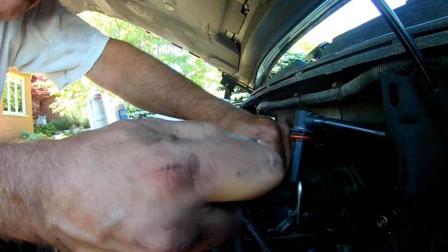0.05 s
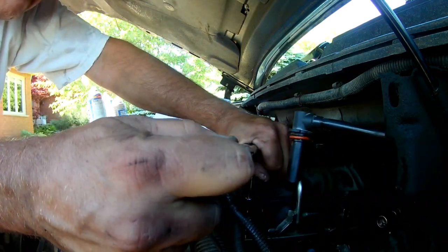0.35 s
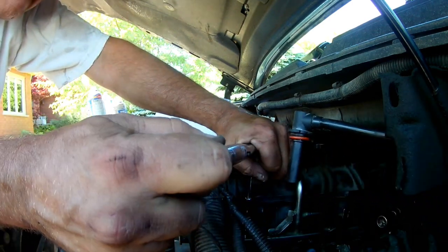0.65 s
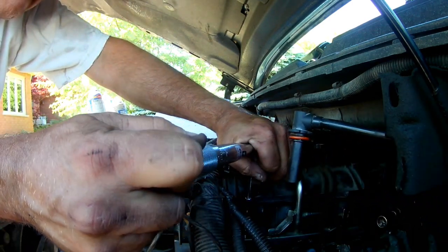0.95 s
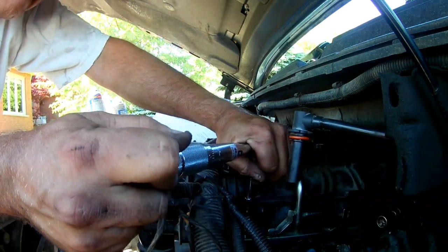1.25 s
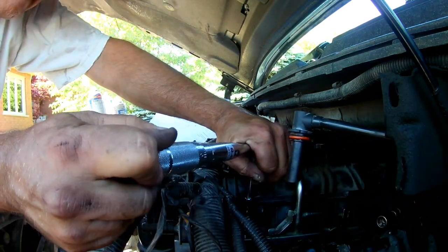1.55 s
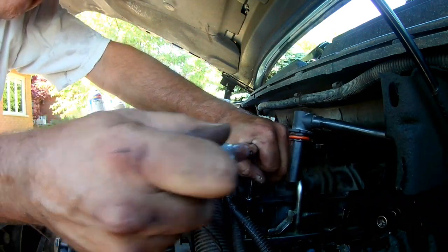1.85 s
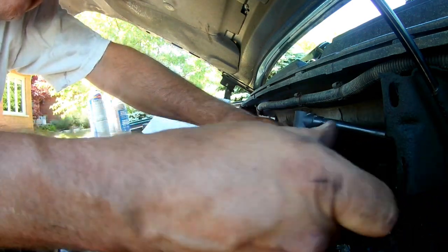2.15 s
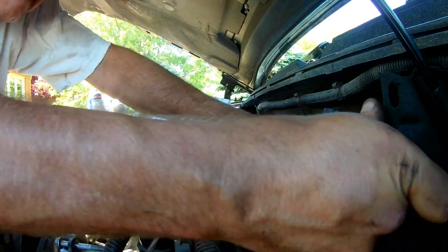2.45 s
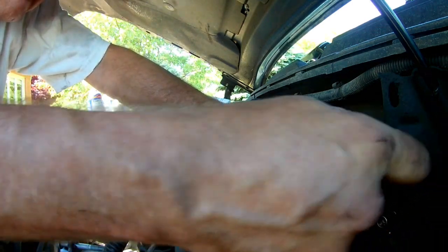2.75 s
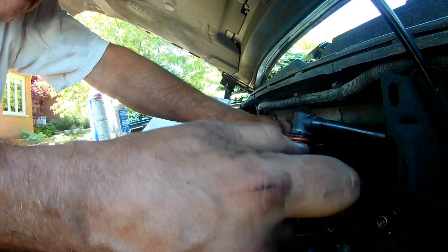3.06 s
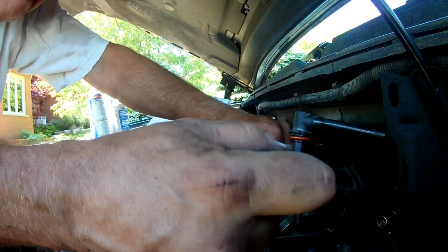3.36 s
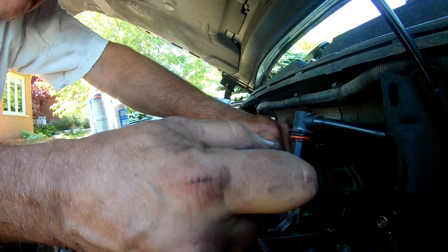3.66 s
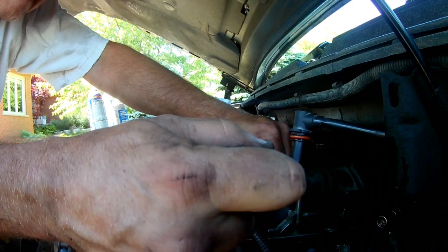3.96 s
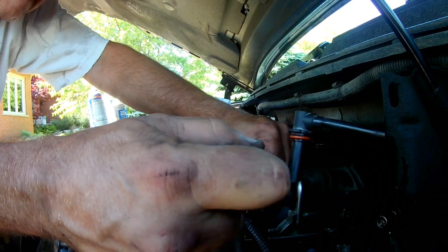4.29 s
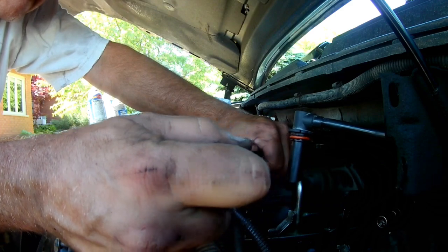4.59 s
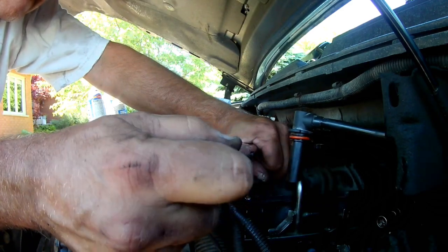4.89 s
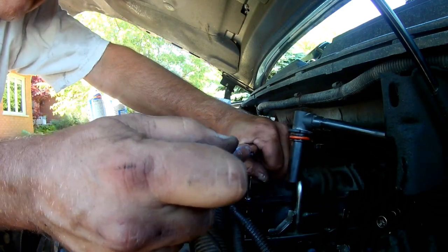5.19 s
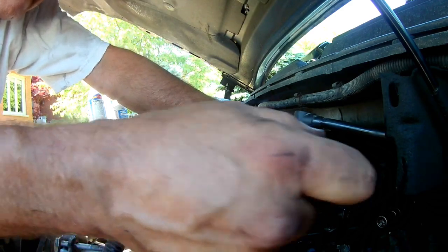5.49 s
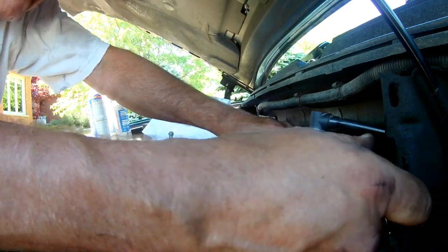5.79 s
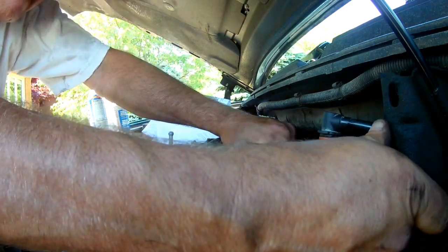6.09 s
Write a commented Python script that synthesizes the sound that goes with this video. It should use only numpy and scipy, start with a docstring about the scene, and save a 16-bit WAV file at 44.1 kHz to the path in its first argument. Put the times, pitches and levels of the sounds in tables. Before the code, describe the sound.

A torque wrench snaps loudly twice per pull on an engine bolt, two pulls, with small ticks and a thud against sheet metal between them.

```python
"""A low outdoor rumble and a faint, fading ring of steel come first. Then a torque wrench is pulled twice
on a bolt in an engine bay, close by. On each pull a lever in its head slaps the tube with a loud snap,
and snaps again as it resets. Around the pulls the tool ticks and knocks, bumps the bodywork once, and
a sleeve brushes past. The raised hood gives the metal sounds a short echo."""
import sys
import numpy as np
from scipy import signal
from scipy.fft import rfft, irfft
from scipy.io import wavfile
from scipy.ndimage import map_coordinates

SR = 44100
rng = np.random.default_rng(int(sys.argv[2]) if len(sys.argv) > 2 else 0)


def transcribe(u):
    """Save the signal u as a 16-bit wav file named by the first command-line argument.

    u: samples, shape (n,) or (channels, n), limited to [-1, 1]; the rate is SR.
    q: integer samples, one column per channel.
    """
    v = np.clip(np.atleast_2d(u).T, -1, 1)
    q = np.round(v * 32767).astype(np.int16)
    wavfile.write(sys.argv[1], SR, q)


N = 274952

# the noisy part of a light tap on steel: pitch_hz, level_db
TAP_NOISE = [(300, -4), (700, 1.5), (1300, 1.5), (2400, -1.5), (4000, -2.5), (6500, -11), (9000, -11),
             (12000, -30)]


def undb(db):
    """Turn decibels into a number to multiply by."""
    return 10 ** (np.asarray(db) / 20)


def add(track, start_s, sound):
    """Mix a sound into a track."""
    start = int(start_s * SR)
    track[start:start + len(sound)] += sound[:N - start]


def dull(sound, cutoff_hz):
    """Soften the treble above the cutoff."""
    return signal.sosfilt(signal.butter(2, min(cutoff_hz, .45 * SR), fs=SR, output="sos"), sound)


def noise_bands(spectrum, size):
    """Return pitches and half-octave bands of noise. The spectrum sets their balance, not their total."""
    points_hz, db = np.transpose(spectrum)
    octave = np.log2(np.maximum(np.fft.rfftfreq(size, 1 / SR), 1))
    gain = undb(np.interp(octave, np.log2(points_hz), db))
    gain *= np.sqrt(size / np.sum(gain ** 2) / 2)
    centres = np.arange(4, 14.1, .5)[:, None]
    share = np.sqrt(np.maximum(1 - 2 * np.abs(octave - centres), 0))
    noise = rng.standard_normal((len(centres), size))
    return 2 ** centres, irfft(rfft(noise) * share * gain, size)


def fade(hz, ring_s, hold_s, linger=0.71, settle_s=0.00025):
    """Loudness of a hit: rises, stays level for hold_s, drops, then loses 60 dB every ring_s."""
    t = np.arange(SR) / SR
    free_s = np.maximum(t - hold_s, 0)
    rise = 1 - np.exp(-2 * t * hz)
    drop = linger + (1 - linger) * np.exp(-free_s / settle_s)
    return rise * drop * np.exp(-np.log(1000) * free_s / ring_s)


def ring(tones, hold_s=0, detune=0.0011):
    """Struck metal rings in fading tones, slightly retuned by the grip on every hit."""
    hz, db, ring_s = np.transpose(tones)[:, :, None]
    chance = rng.standard_normal((len(tones), 2))
    cycles = hz * (1 + detune * chance[:, :1]) * np.arange(SR) / SR + chance[:, 1:]
    return np.sum(undb(db) * fade(hz, ring_s, hold_s) * np.sin(2 * np.pi * cycles), axis=0)


def hit(tones, noise, noise_db, ring_s, slope, hold_s):
    """One metal contact: clear tones over a noisy crack. More slope makes the crack's treble die sooner."""
    hz, bands = noise_bands(noise, SR)
    stretch = (1000 / hz) ** slope
    crack = np.sum(bands * fade(hz, ring_s * stretch, hold_s * stretch), axis=0)
    return ring(tones, hold_s) + undb(noise_db) * crack


def drift(rate_hz):
    """A smooth random wobble, roughly between -1 and 1."""
    steps = rng.standard_normal(512)
    return map_coordinates(steps, [np.arange(N) / SR * rate_hz], order=2, mode="wrap")


def outdoors(level_db=-51.7, swell_db=1.0, flicker_db=0.74):
    """A distant rumble whose bands swell together and flicker on their own."""
    # the rumble from bass to treble: pitch_hz, level_db
    rumble_noise = [(20, -16), (45, -7), (70, -3.5), (95, 0), (120, -3), (160, -8.5), (250, -14.5),
                    (400, -17.5), (800, -20), (1300, -25.5), (2200, -34.5), (4500, -39.5), (12000, -47)]
    _, bands = noise_bands(rumble_noise, N)
    rumble = sum(band * undb(flicker_db * drift(3.2)) for band in bands)
    return rumble * undb(level_db - swell_db * drift(0.91))


def fading_steel():
    """A steel part is still ringing faintly at the start."""
    # its tones: pitch_hz, level_db, ring_s
    fading_tones = [(553, -53, 1), (1720, -62, 0.49)]
    return ring(fading_tones)


def snap(tones, noise, bright_db, noise_db, spread_s):
    """Hard steel meets with a bright click; the hit then spreads through tube, socket and engine."""
    # the first touch of the steel: pitch_hz, level_db
    bright_noise = [(3000, -14), (6000, -3), (9000, 3), (10500, -3), (12000, -15.5)]
    hz, bands = noise_bands(bright_noise, SR)
    click = np.sum(bands * fade(hz, ring_s=.014, hold_s=.0011), axis=0)
    spreading = 1 - np.exp(-np.arange(SR) / SR / spread_s)
    body = hit(tones, noise, noise_db, ring_s=.065, slope=.048, hold_s=.0085)
    return undb(bright_db) * click + spreading * body


def wrench():
    """The lever in the head slaps the tube as it trips and as it resets; the steel sings on faintly."""
    # the head trips, then snaps back: start_s, level_db, sing_db
    trips = [(1.4872, -13, -48.5), (4.9863, -11.8, -50.5)]
    resets = [(1.8545, -12.7, -62), (5.3983, -13.7, -62)]
    # tones of each snap and of the singing steel: pitch_hz, level_db, ring_s
    trip_tones = [(342, -20.5, 0.12), (573, -17.5, .09), (659, -22, 0.083), (903, -23, 0.081),
                  (1055, -16, 0.041), (1203, -11.5, 0.064), (1342, -16.5, .07), (1519, -13, 0.068),
                  (1637, -5.5, 0.072), (1738, -4.5, 0.0351), (1874, -4.5, 0.069), (2018, -11.5, .04),
                  (2365, -21.5, 0.0496), (2560, -16.5, 0.044), (2790, -18, .04), (3570, -20.5, .04),
                  (3768, -18.5, 0.1), (4084, -13, .04), (5452, -22.5, .04), (5925, -20, .028),
                  (7080, -26.5, .04), (9870, -24.5, 0.045)]
    reset_tones = [(372, -18, 0.11), (579.6, -26.5, .11), (1212, -7, .04), (1340, -22, 0.048),
                   (1536, -16.5, .05), (1652, -17.5, .05), (1783, -16, .05), (1983, -10.5, 0.055),
                   (2377, -17.5, 0.044), (2570, -17, 0.079), (2870, -16.5, .045), (2958, -14.5, .05),
                   (3530, -17, .045), (3860, -10.5, .05), (3920, -13.5, .05), (4085, -8, 0.025),
                   (4520, -18, 0.055), (4370, -22.5, .04), (5520, -18, 0.035), (10100, -22, 0.028)]
    steel_tones = [(3628, -16, .5), (4118, -1, .5), (4199, -7, .35), (5060, -22, .9), (5286, -13, .95)]
    # the noisy part of each snap: pitch_hz, level_db
    trip_noise = [(150, -20.5), (300, -10.5), (600, 0), (850, -3), (1700, 2.5), (2900, -7), (4500, -9),
                  (6200, -8), (10500, -18.5), (12000, -28)]
    reset_noise = [(150, -13.5), (300, -3.5), (600, 1), (850, -3.5), (1300, 3), (4000, -2), (5000, -8.5),
                   (7200, -6.5), (10300, -12), (12000, -28.5)]
    out = np.zeros(N)
    for start_s, level_db, sing_db in trips:
        trip = snap(trip_tones, trip_noise, bright_db=-6, noise_db=-3.5, spread_s=.0012)
        add(out, start_s, undb(level_db) * trip)
        add(out, start_s, undb(sing_db) * ring(steel_tones))
    for start_s, level_db, sing_db in resets:
        reset = snap(reset_tones, reset_noise, bright_db=-12, noise_db=-3, spread_s=.00096)
        add(out, start_s, undb(level_db) * reset)
        add(out, start_s, undb(sing_db) * ring(steel_tones, detune=.0005))
    return out


def hood_echo(sound, level_db=-19.5, ring_s=0.2, slope=0.096, delay_s=0.0086):
    """Sound bounces between hood and engine; the bass lingers longest."""
    # the echo from bass to treble: pitch_hz, level_db
    echo_noise = [(100, 1.0), (600, 4.5), (1500, -8), (4000, -7), (12000, -6)]
    hz, bands = noise_bands(echo_noise, SR)
    tail = np.sum(bands * fade(hz, ring_s * (1000 / hz) ** slope, hold_s=0), axis=0)
    tail /= np.sqrt(np.sum(tail ** 2))
    out = np.zeros(N)
    add(out, delay_s, signal.fftconvolve(sound, tail)[:N])
    return undb(level_db) * out


def tick(cutoff_hz):
    """One light tap of the extension, the bar between wrench and socket; a lower cutoff makes it duller."""
    # the bar's tones: pitch_hz, level_db, ring_s
    bar_tones = [(942, -2.5, .04), (1298, 0.5, 0.035), (1590, -10, 0.068), (1886, -4, 0.032),
                 (2890, -33, .035)]
    return dull(hit(bar_tones, TAP_NOISE, noise_db=-1, ring_s=.1, slope=.17, hold_s=.0025), cutoff_hz)


def extension_ticks(fall_back_s=.012, quieter_db=9):
    """The loose bar ticks, then falls back with a quieter tick."""
    # the first tick of each pair: start_s, level_db, cutoff_hz
    ticks = [(2.2313, -42, 4400), (2.447, -43.5, 1280), (4.771, -48.5, 2200), (5.695, -45.5, 2930)]
    out = np.zeros(N)
    for start_s, level_db, cutoff_hz in ticks:
        add(out, start_s, undb(level_db) * tick(cutoff_hz))
        add(out, start_s + fall_back_s, undb(level_db - quieter_db) * tick(cutoff_hz=1600))
    return out


def socket_knocks():
    """The socket knocks as it settles on the bolt."""
    # each knock: start_s, level_db, cutoff_hz
    knocks = [(2.262, -35.5, 6000), (5.757, -40, 5000)]
    # the socket's tones: pitch_hz, level_db, ring_s
    socket_tones = [(225, -5, .16), (274, -7, .16), (368, -10, .12), (476, -9, .2), (1100, -13, .08),
                    (1321, -14, .08), (1483, -5, .11), (1490, -20, .7)]
    # the noisy part of a knock: pitch_hz, level_db
    socket_noise = [(120, 2), (300, 4), (750, -9), (1400, 1.5), (2200, -14.5), (4000, -24), (8000, -38)]
    out = np.zeros(N)
    for start_s, level_db, cutoff_hz in knocks:
        knock = hit(socket_tones, socket_noise, noise_db=-4, ring_s=.17, slope=.52, hold_s=.015)
        add(out, start_s, undb(level_db) * dull(knock, cutoff_hz))
    return out


def ratchet():
    """The ratchet's small catch clicks as it drops over the teeth."""
    # each drop: start_s, level_db
    drops = [(2.366, -40), (2.370, -33)]
    # the catch's tones: pitch_hz, level_db, ring_s
    catch_tones = [(1024, -8.5, 0.059), (1167, -12, 0.068), (1916, -8.5, 0.045), (2970, -19, .04),
                   (3750, -10, .04), (4014, -2.5, 0.038), (5250, -14, .04), (11400, -22.5, .04)]
    out = np.zeros(N)
    for start_s, level_db in drops:
        click = hit(catch_tones, TAP_NOISE, noise_db=-6, ring_s=.083, slope=.16, hold_s=.0031)
        add(out, start_s, undb(level_db) * click)
    return out


def bodywork_bump(start_s=2.533, level_db=-11.5, first_gap_s=.0148, loss_db=6.6):
    """The tool hits sheet metal and rocks to rest in ever slower, weaker bounces."""
    # the panel's tones: pitch_hz, level_db, ring_s
    panel_tones = [(107, -23, .45), (130, -13, .3), (177, -4, .12), (285, -3, .1), (327, -31, 1.1),
                   (366, -12, .11), (476, -11, .16), (640, -5, .09), (802, -12, .12), (982, -14, .11),
                   (1106, -13, .09), (1230, -17, .08), (1480, -8, .07), (1736, -22, .06), (1932, -21, .05)]
    # the noisy part of its thud: pitch_hz, level_db
    panel_noise = [(25, -47), (60, -24), (130, -5.5), (230, 0), (450, -11), (750, -10), (1400, -15.5),
                   (2000, -26), (2800, -30), (5000, -42), (12000, -30)]
    hard_hz, soft_hz, cushion_s = 4240, 190, .017  # the hand cushions the tool, so bounces get duller
    rattle_db, rattle_loss_db, rattle_lag_s = -31, 10.5, .001
    out = np.zeros(N)
    for bounce in range(5):
        after_s = first_gap_s * bounce ** 2
        cutoff_hz = soft_hz + (hard_hz - soft_hz) * np.exp(-after_s / cushion_s)
        thud = hit(panel_tones, panel_noise, noise_db=-5.5, ring_s=.13, slope=.42, hold_s=.0078)
        add(out, start_s + after_s, undb(level_db - bounce * loss_db) * dull(thud, cutoff_hz))
        if bounce % 2:  # every other bounce rattles the extension, weaker and duller each time
            earlier = bounce // 2
            rattle = undb(rattle_db - earlier * rattle_loss_db) * tick(cutoff_hz=6900 * .135 ** earlier)
            add(out, start_s + after_s + rattle_lag_s, rattle)
    return out


def sleeve():
    """Soft swells of noise as the arm moves: a sleeve brushes past and the air stirs."""
    # each swell: peak_s, length_s, pitch_hz, level_db
    swells = [(2.85, 0.11, 1200, -65), (4.139, 0.082, 1500, -65), (4.41, 0.084, 49.5, -45.5)]
    out, t = np.zeros(N), np.arange(N) / SR
    for peak_s, length_s, pitch_hz, level_db in swells:
        band = signal.butter(2, [pitch_hz / 2, pitch_hz * 2], "band", fs=SR, output="sos")
        noise = signal.sosfilt(band, rng.standard_normal(N))
        swell = np.exp(-(2 * (t - peak_s) / length_s) ** 2)
        out += undb(level_db) * noise / noise.std() * swell
    return out


def scene():
    """The metal sounds, their echo under the hood, the sleeve and the open air."""
    metal = wrench() + extension_ticks() + socket_knocks() + ratchet() + bodywork_bump()
    add(metal, 0, fading_steel())
    return (metal + hood_echo(metal) + sleeve() + outdoors())[None]


def record(dry, notch_hz=8100, notch_width_hz=1000, hiss_db=-69.5, top_hz=11900):
    """The microphone's opening cuts a narrow gap in the treble; its amplifier rounds peaks and hisses."""
    notch = signal.iirnotch(notch_hz, notch_hz / notch_width_hz, fs=SR)
    heard = signal.lfilter(*notch, signal.lfilter(*notch, dry))
    heard = .9 * np.tanh(heard / .9)
    heard += undb(hiss_db) * rng.standard_normal(dry.shape)
    treble_cut = signal.ellip(10, .2, 70, top_hz, fs=SR, output="sos")
    return signal.sosfilt(treble_cut, heard)


dry = scene()
out = record(dry)
transcribe(out)
```